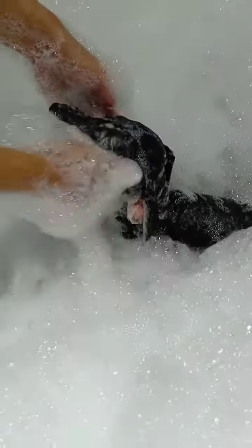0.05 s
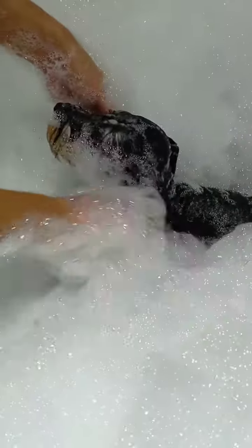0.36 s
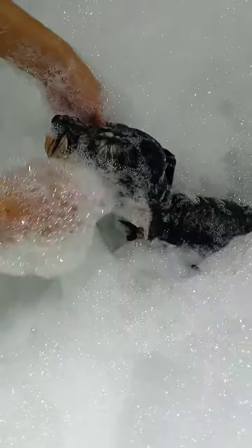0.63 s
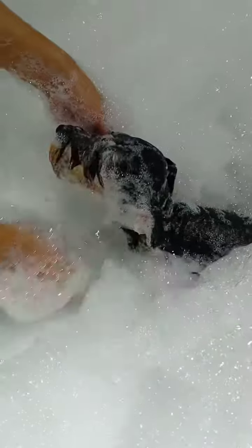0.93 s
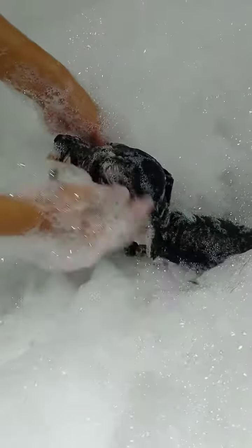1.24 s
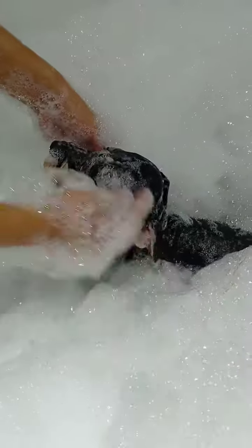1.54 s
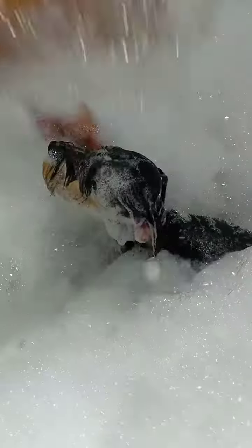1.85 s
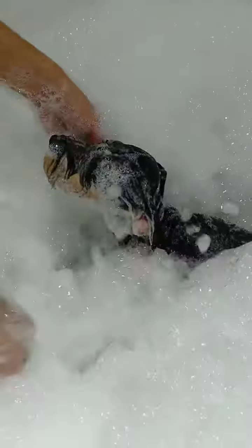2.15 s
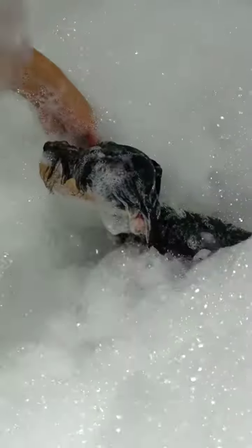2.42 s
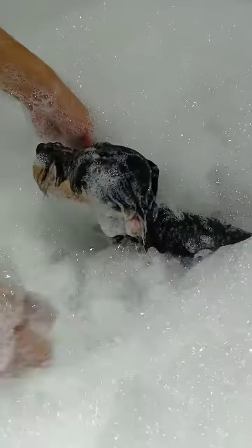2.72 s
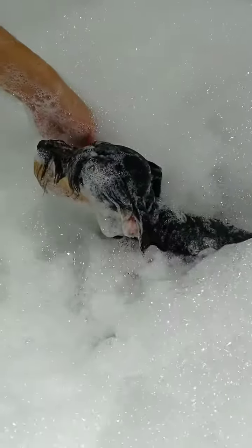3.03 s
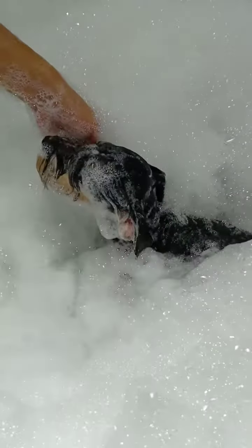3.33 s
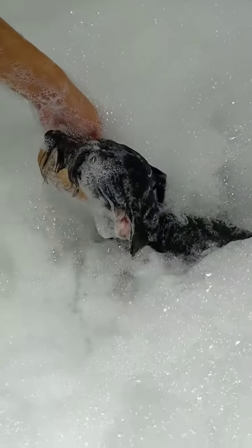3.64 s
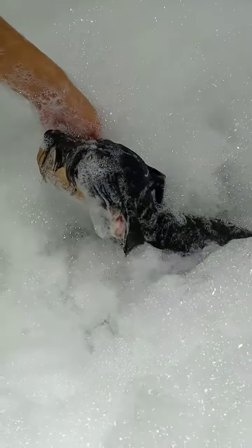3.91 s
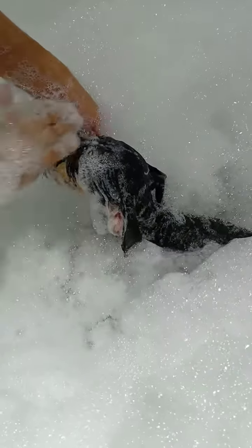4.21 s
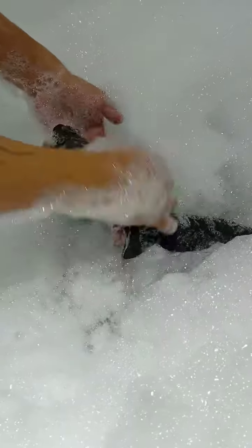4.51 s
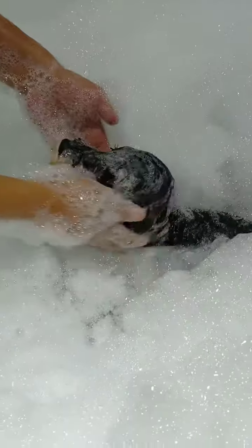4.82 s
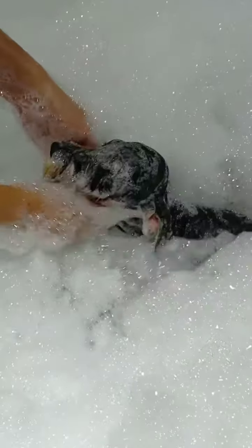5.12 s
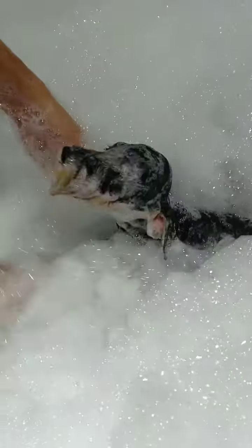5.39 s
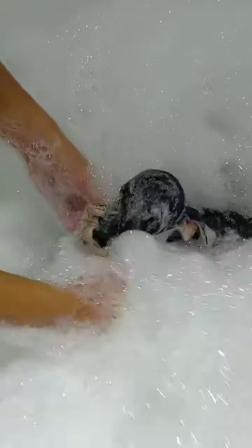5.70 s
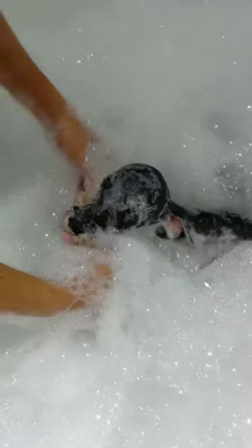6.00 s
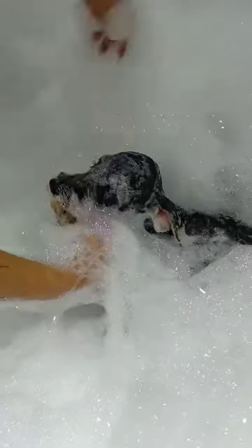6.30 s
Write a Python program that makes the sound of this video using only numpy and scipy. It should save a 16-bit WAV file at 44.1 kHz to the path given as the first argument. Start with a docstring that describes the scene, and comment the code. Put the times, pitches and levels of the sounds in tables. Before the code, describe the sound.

From the start, an air-jet tub's blower runs with a steady, many-toned whine and airy hiss, heard close by in a tiled room. Beneath it the water throbs and churns with low, irregular bubble thumps, and foam crackles faintly. At about 0.4 seconds a handful of water slaps down in a splash, followed by a deep glug and a smaller smack near 0.9. Small drips plink around 1.4 and 2 seconds, with light patter and more glugs near 2.2. At about 3.8 seconds the blower clicks off softly and coasts down, its tones sliding steadily lower and fading through the end. The throbbing thins out after 5 seconds. Soft foam patters continue, a few drips fall between 5.1 and 5.4, and a quiet glug comes near 5.8. A ventilation fan's low, steady hum runs throughout and remains as the sound ends around 6.4 seconds.

```python
"""A fast blower whines over throbbing, churning water: a dog's bath in a foamy air-jet tub in a tiled room.
The rotor sings and hisses as it drives air through the water, where big pockets ring low and small
bubbles burst. A handful of water splashes down once, and foam patters and drips. The blower clicks
off and coasts down, its tones sinking, and leaves the steady hum of a ventilation fan."""
import sys
import numpy as np
from scipy import signal
from scipy.fft import rfft, irfft
from scipy.io import wavfile
from scipy.ndimage import uniform_filter1d, map_coordinates

SR = 44100
rng = np.random.default_rng(int(sys.argv[2]) if len(sys.argv) > 2 else 0)


def to_wav(s):
    """Save 16-bit WAV."""
    ch = np.atleast_2d(s).T  # columns
    pcm = np.round(np.clip(ch, -1, 1) * 32767)  # PCM
    wavfile.write(sys.argv[1], SR, pcm.astype(np.int16))


N = 280035
TIME, FREQS = np.arange(N) / SR, np.maximum(np.fft.rfftfreq(N, 1 / SR), 1)
LEFT_RIGHT = np.array([[1], [-1]])
SWITCH_OFF_S, FULL_TURNS_PER_S = 3.786, 306.5
COASTING = np.clip((TIME - SWITCH_OFF_S) / 0.35, 0, 1)  # 0 under power, 1 while coasting


def from_db(db):
    """Decibels to gain."""
    return 10 ** (np.asarray(db) / 20)


def rms_one(x):
    """Scale to unit power."""
    return x / np.sqrt(np.mean(x ** 2) + 1e-20)


def at_hz(points, hz):
    """Read a curve on a log-frequency axis."""
    f, value = np.transpose(points)
    return np.interp(np.log(hz), np.log(np.sort(f)), value)


def drift(per_s):
    """Smooth random modulation with a spread of about 1."""
    knots, coarse_time = rng.standard_normal(2048), TIME[::64]
    curve = map_coordinates(knots, [coarse_time * per_s + 2], order=3, mode="wrap")
    return np.interp(TIME, coarse_time, curve)


def wobble(per_s):
    """Complex random modulation: loudness and phase waver together."""
    return (drift(per_s) + 1j * drift(per_s)) / np.sqrt(2)


def resonances(modes, hz=FREQS):
    """Gain of a few resonant peaks and dips at the given frequencies."""
    extra_power = sum((from_db(db) ** 2 - 1) / (1 + (2 * (hz - centre) / width) ** 2) ** 2
                      for centre, width, db in modes)
    return np.sqrt(1 + extra_power.clip(-.5))


def grains(per_s, spread_db):
    """Two streams of random clicks, their sizes scattered by spread_db."""
    born = rng.random((2, N)) < per_s / SR
    polarity = rng.choice([-1, 1], (2, N))
    return born * polarity * from_db(spread_db * np.minimum(rng.exponential(1, (2, N)), 4))


def swells(events, bed_db):
    """Gain of a bed with one bell-shaped swell per event, added in power."""
    power = sum(from_db(db) ** 2 * np.exp(-(2 * (TIME - s) / length) ** 2) for s, db, length in events)
    return np.sqrt(from_db(bed_db) ** 2 + power)


# Stereo width. Each row: frequency in Hz, left-right correlation.
LIKENESS = [(60, .95), (150, .98), (290, .86), (450, .62), (700, .5), (1250, -.05), (2000, .1), (3200, .15),
            (5500, -.05), (15000, 0)]
# Stereo balance. Each row: frequency in Hz, left over right in dB.
BALANCE = [(60, -3.5), (110, -2.5), (200, -2), (380, 0.5), (700, -2.5), (1290, 1), (2380, 3), (4400, 0.5),
           (8000, -0.5), (15000, 2)]
def colour(pair, spectrum, peaks=1):
    """Shape two unrelated signals into a unit-power stereo bed, centred in the bass and wide above."""
    mid, side = rfft(pair) * from_db(at_hz(spectrum, FREQS)) * peaks
    alike = np.clip(at_hz(LIKENESS, FREQS), -.99, .99)
    ears = np.sqrt(1 + alike) * mid + LEFT_RIGHT * np.sqrt(1 - alike) * side
    return rms_one(irfft(ears * pan(FREQS), N))


def pan(hz):
    """Left and right gains at a frequency."""
    return from_db(LEFT_RIGHT * at_hz(BALANCE, hz) / 2)


def room(x, t60, wet_db):
    """Direct sound plus a dense tiled-room tail, different at each ear; power is kept."""
    size = SR // 2
    tail = rng.standard_normal((2, size)) * from_db(-60 * TIME[:size] / t60)
    tail *= from_db(wet_db) / np.sqrt(np.sum(tail ** 2, axis=1, keepdims=True))
    wet = signal.fftconvolve(np.atleast_2d(x), tail, axes=1)[:, :N]
    return (x + wet) / np.sqrt(1 + from_db(wet_db) ** 2)


def shaft_speed(friction=13.16, air_drag=.0013425):
    """Turns per second: steady under power, then losing friction + air_drag * speed ** 2 each second."""
    crossover = np.sqrt(friction / air_drag)  # the speed at which both brake equally
    coasting_s = np.maximum(TIME - SWITCH_OFF_S, 0)
    angle = np.arctan(FULL_TURNS_PER_S / crossover) - coasting_s * friction / crossover
    return crossover * np.tan(angle)


def slowdown_db(speed, fall_db):
    """Level change as the rotor slows: down by fall_db for a tenfold drop in speed."""
    return fall_db * np.log10(speed / FULL_TURNS_PER_S)


def rotor_tone(shaft_hz, multiple, level_db, flutter, fading):
    """One harmonic of the shaft: it flutters quickly and wavers slowly."""
    envelope = from_db(level_db) * (1 + flutter * wobble(45) + fading * wobble(9))
    cycles = multiple * np.cumsum(shaft_hz) / SR + rng.random()
    ear_phase = LEFT_RIGHT * np.arccos(at_hz(LIKENESS, multiple * shaft_hz[0])) / 2
    tone = np.sqrt(2) * np.real(envelope * np.exp(1j * (2 * np.pi * cycles + ear_phase)))
    return tone / np.sqrt(1 + flutter ** 2 + fading ** 2)


# The rotor's lead tones. Each row: multiple of the shaft rate, level before the outlet in dB.
LEAD_TONES = [(9, -49.5), (13, -48), (15, -55.5)]
# The 13th harmonic swells and eases. Each row: time in seconds, gain in dB.
HIGH_LEAD_SWELL = [(.55, -11), (.85, -3.5), (1.9, -2.5), (3.78, -6), (4.0, -2.5), (4.5, -2), (4.85, 4),
                   (5.3, -1), (5.7, -2.5), (6.3, -5.5)]
# The outlet's colour on the leads. Each row: frequency in Hz, gain in dB.
OUTLET_EQ = [(1200, -7), (1450, -4), (1650, 1.5), (1850, 4.5), (2080, 1.5), (2290, 5), (2480, -3.5),
             (2760, -0.9), (3050, -13), (3430, -31), (3750, -10.5), (3985, -2.5), (4400, -15)]
# Outlet resonances where a sliding lead flares. Each row: centre in Hz, width in Hz, gain in dB.
OUTLET_MODES = [(1520, 40, 1), (1980, 69, 4.5), (2230, 40, 2), (2640, 60, 4)]
# The other harmonics. Each row: multiple of the shaft rate, level in dB, change when coasting in dB.
BACKING_TONES = [(1, -35, 3), (2, -42.5, 1.5), (3, -44, -1), (5, -57, -2.5), (6, -54, -9), (7, -62, -1),
                 (8, -59, -8), (10, -69.5, 0), (11, -69, -1.5), (12, -67.5, -5), (16, -61.5, -6),
                 (17, -67, -4.5), (18, -59, 2.5), (19, -72, -3.5), (20, -79.5, 9.5), (21, -84.5, 10.5),
                 (22, -83.5, 11), (25, -96.5, 20), (28, -93.5, 16)]
# The housing's colour on those as they slide. Each row: frequency in Hz, relative gain in dB.
HOUSING_EQ = [(130, -4), (300, 0), (700, 2), (1100, 4), (1450, -3), (2100, 2), (2400, -3), (2800, -8),
              (3200, -16), (4400, -18), (5400, -13), (7000, -26)]
def whine(speed, jitter=0.00061, flutter=0.12, coast_flutter=.65, low_flutter=0.29):
    """Rotor tones slide through outlet and housing; coasting, they fade and smear in their own reverb."""
    shaft_hz = speed * (1 + jitter * drift(25))
    swell_db = np.interp(TIME, *np.transpose(HIGH_LEAD_SWELL))
    voices = []
    for multiple, db in LEAD_TONES:
        hz = multiple * speed
        lead_db = db + (swell_db if multiple == 13 else 0)
        outlet_db = at_hz(OUTLET_EQ, hz) + 20 * np.log10(resonances(OUTLET_MODES, hz))
        voices.append((multiple, lead_db + outlet_db + slowdown_db(speed, fall_db=14)))
    for multiple, db, coast_db in BACKING_TONES:
        hz = multiple * speed
        housing_db = at_hz(HOUSING_EQ, hz) - at_hz(HOUSING_EQ, hz[0])
        voices.append((multiple, db + COASTING * coast_db + housing_db + slowdown_db(speed, fall_db=42)))
    rough = flutter + COASTING * (coast_flutter - flutter)
    tones = sum(rotor_tone(shaft_hz, multiple, db, rough + low_flutter / multiple, fading=0.063)
                for multiple, db in voices)
    return (1 - COASTING) * tones + room(COASTING * tones, t60=.35, wet_db=-1.5)


# Cavities of the impeller casing. Each row: centre in Hz, width in Hz, gain in dB.
CASING_MODES = [(1158, 70, 10), (1090, 72, 13), (1010, 50, 6.5), (695, 120, 10)]
def whir(speed, start_db=-51.5, growth_db_per_s=2.08, coast_db=-0.5):
    """Impeller eddies breathe at four times the shaft rate; as the band sinks, the casing howls."""
    eddies = np.array([wobble(140), wobble(140)])
    grown_db = growth_db_per_s * np.minimum(TIME, SWITCH_OFF_S)
    gain = from_db(start_db + grown_db + coast_db * COASTING + slowdown_db(speed, fall_db=24))
    band = np.sqrt(2) * gain * np.real(eddies * np.exp(2j * np.pi * np.cumsum(4 * speed) / SR))
    howl = irfft(rfft(band) * resonances(CASING_MODES), N)
    return room(howl, t60=.45, wet_db=-3)


# The blower's hiss. Each row: frequency in Hz, relative level in dB.
RUSH_EQ = [(600, -25), (950, -4.5), (1150, -4), (1400, -7), (2100, -5), (2700, -10), (3150, -23.5),
           (4300, -22.5), (5250, -16.5), (5750, -26.5), (6500, -28.5), (7400, -42), (8600, -37),
           (9700, -47.5), (12000, -43.5), (13700, -42), (15500, -50.5)]
# The duct's ring. Each row: centre in Hz, width in Hz, gain in dB.
DUCT_MODES = [(1030, 89, 2.5), (1085, 20, 13.5), (1120, 85, 8.5), (1238, 25, 7.5), (1277, 21, 12),
              (1530, 20, 8), (1953, 3.8, 9.5), (2220, 61, -8.5)]
def air_rush(speed, ringing_db=-34, plain_db=-33):
    """Turbulence hisses out of the blower and rings its duct, most strongly at full speed."""
    noise = rng.standard_normal((2, N))
    ringing = from_db(ringing_db) * colour(noise, RUSH_EQ, resonances(DUCT_MODES))
    plain = from_db(plain_db) * colour(noise, RUSH_EQ)
    blend = from_db(slowdown_db(speed, fall_db=28))
    return from_db(slowdown_db(speed, fall_db=38)) * (blend * ringing + (1 - blend) * plain)


# The low bed of air pockets. Each row: frequency in Hz, relative level in dB.
RUMBLE_EQ = [(25, -44), (40, -40), (50, -24), (75, -17.5), (95, -12), (109, -17.5), (121, -2.5), (145, 3),
             (168, -13), (205, -4.5), (228, -18), (300, -20), (450, -44.5), (2000, -79.5)]
# The boom of tub and room. Each row: centre in Hz, width in Hz, gain in dB.
BOOM_MODES = [(69, 6.8, -1.5), (98, 9.3, 4), (123.3, 11, 6.5), (133, 22, -1), (204, 29, 4), (240, 17, -3.5)]
# The rumble heaves. Each row: peak time in seconds, level in dB, length in seconds.
HEAVES = [(.48, -29.5, 0.085), (1.78, -28, 0.17), (2.25, -28, 0.3), (3.15, -36, 0.099), (3.66, -26.5, 0.11),
          (4.17, -34, 0.17), (5.41, -31, 0.15), (5.93, -37, 0.092), (6.28, -36.5, 0.059)]
def rumble(speed, bed_db=-30, surge_db=2):
    """Lesser air pockets thump in the tub: a crowd that heaves and thins out with the air flow."""
    thumps = grains(1200 * speed / FULL_TURNS_PER_S, spread_db=0)
    crowd = colour(thumps, RUMBLE_EQ, resonances(BOOM_MODES))
    crowd /= np.sqrt(uniform_filter1d(np.mean(crowd ** 2, axis=0), SR // 25) + 1e-9)  # level over 40 ms
    return crowd * swells(HEAVES, bed_db + slowdown_db(speed, fall_db=37) + surge_db * drift(24))


# The throb. Each row: peak time in seconds, relative level in dB, pitch in Hz, swell in seconds.
AIR_POCKETS = [(0.023, -21.5, 182, 0.035), (0.087, -12, 137, 0.012), (0.188, -17, 143, 0.018),
               (0.298, -17.5, 133, 0.012), (0.347, -16, 172, 0.011), (0.387, -16, 167, 0.0063),
               (0.438, -15, 144, 0.01), (.487, -19, 136, 0.0063), (0.521, -13.5, 170, 0.0096),
               (0.703, -21, 140, 0.024), (0.751, -17, 167, 0.019), (0.904, -23, 157, 0.008),
               (1.035, -16.5, 141, 0.026), (1.099, -15.5, 190, 0.013), (1.162, -15.5, 143, 0.02),
               (1.338, -15, 156, 0.01), (1.368, -22, 136, 0.022), (1.534, -20, 124.7, .035),
               (1.581, -15, 146, 0.0088), (1.646, -26, 141, .013), (1.74, -17, 146, 0.036),
               (1.781, -29, 129, 0.0098), (1.821, -30, 145, .01), (1.907, -27, 155, 0.012),
               (1.946, -17.5, 153, 0.02), (1.992, -15, 129, 0.014), (2.043, -15, 163, 0.012),
               (2.145, -23, 190, 0.032), (2.223, -17.5, 140, 0.027), (2.289, -12, 128.5, 0.028),
               (2.35, -26, 130, 0.016), (2.397, -26.5, 135, 0.012), (2.508, -21, 133, 0.02),
               (2.641, -12.5, 146.3, 0.022), (2.755, -15, 178, 0.032), (2.836, -21, 150, 0.011),
               (2.89, -13.5, 168, 0.011), (2.928, -23, 154, 0.011), (2.955, -15.5, 154, 0.013),
               (2.978, -27, 151, 0.0065), (3.012, -19, 146, 0.0087), (3.055, -23, 169, 0.0093),
               (3.14, -23, 163, 0.013), (3.268, -21, 145, 0.028), (3.338, -21, 139, 0.02),
               (3.467, -16, 147, 0.013), (3.563, -14, 151, 0.0078), (3.641, -15, 137, 0.022),
               (3.684, -26, 167, 0.018), (3.736, -21, 174, 0.015), (3.787, -16, 178, 0.012),
               (3.846, -18.5, 132, 0.02), (3.954, -16.5, 168, 0.013), (4.12, -20, 161, 0.026),
               (4.214, -22, 176, 0.0065), (4.282, -18, 174, 0.0089), (4.379, -18.5, 163, 0.029),
               (4.484, -23, 141, 0.014), (4.546, -14, 190, 0.007), (4.597, -19.5, 188, 0.0083),
               (4.667, -32, 166, 0.013), (4.725, -25, 138, 0.014), (4.787, -20.5, 143, 0.026),
               (4.844, -38, 159, 0.011), (4.922, -16.5, 193, 0.025), (5.001, -18.5, 157, 0.016),
               (5.113, -22, 176, 0.02)]
def air_pockets(gain_db=-3, chirp=0.14, low_cut_hz=95):
    """Each big pocket swells within a few cycles and rings out, rising a little as it floats up."""
    out = np.zeros(N)
    for s, db, hz, swell in AIR_POCKETS:
        span = (TIME > s - swell) & (TIME < s + 8 * swell)
        age = TIME[span] - s
        envelope = ((1 + age / swell) * np.exp(-age / swell)) ** 2
        cycles = hz * age * (1 + chirp * age) + rng.random()
        out[span] += from_db(db + gain_db) * envelope * np.sin(2 * np.pi * cycles)
    return signal.sosfilt(signal.butter(2, low_cut_hz, "high", fs=SR, output="sos"), out) * pan(hz=150)


# The body of the churning water. Each row: frequency in Hz, relative level in dB.
CHURN_EQ = [(30, -54), (120, -22), (240, -1), (275, 4), (305, 7.5), (335, 5), (370, 0), (480, 4.5),
            (580, -1.5), (700, -3.5), (850, -4.5), (1000, -18), (1500, -33.5), (4000, -76)]
# The tub's hollow ring. Each row: centre in Hz, width in Hz, gain in dB.
TUB_MODES = [(231, 32, 8.5), (484, 18, -1.5), (590, 11, 5.5), (677.7, 30, 11), (779, 68, 4)]
# The water sloshes. Each row: peak time in seconds, relative level in dB, length in seconds.
SLOSHES = [(0.52, -40.5, 0.072), (1.06, -32, 0.066), (1.78, -36, 0.15), (2.24, -38.5, 0.12),
           (2.95, -35.5, 0.074), (5.3, -37, 0.53)]
def churn(speed, bed_db=-35, lump_db=1, gain_db=4, stall_turns_per_s=208, stall_db=-7):
    """Small bubbles burst in crowds, harder with each slosh, and die down once the air stalls."""
    stalled = np.clip((stall_turns_per_s - speed) / 69, 0, 1)  # 1: air barely pushes through the water
    bursts = grains(4000 * speed / FULL_TURNS_PER_S, spread_db=1.5)
    bubbles = colour(bursts, CHURN_EQ, resonances(TUB_MODES))
    envelope = swells(SLOSHES, bed_db + slowdown_db(speed, fall_db=2) + stall_db * stalled)
    return bubbles * from_db(gain_db + lump_db * drift(22.13)) * envelope


# The fan's hum. Each row: pitch in Hz, level in dB.
FAN_TONES = [(187.8, -30), (375.7, -46.5)]
# The fan's breath. Each row: frequency in Hz, relative level in dB.
FAN_AIR_EQ = [(40, -22), (70, -16), (100, -15), (145, -8), (230, -4.5), (450, -4.5), (700, -11.5),
              (1000, -11), (1350, -29.5), (2200, -17), (3100, -24), (5200, -36.5), (7500, -67.5),
              (15000, -61)]
def fan(waver_db=1.13, wander=0.0015, pan_db=-0.26, air_db=-41):
    """A ventilation fan hums under everything, wavering slightly over soft air noise."""
    warped_time = TIME + np.cumsum(wander * drift(5.5)) / SR
    hum = np.zeros(N)
    for hz, db in FAN_TONES:
        gain = np.sqrt(2) * from_db(db + waver_db * drift(11))
        hum += gain * np.sin(2 * np.pi * (hz * warped_time + rng.random()))
    breath = from_db(air_db) * colour(rng.standard_normal((2, N)), FAN_AIR_EQ)
    return hum * from_db(pan_db * LEFT_RIGHT) + breath


# Splashes and foam patter, plus the blower's switch clicking off at 3.77 s.
# Each row: start in seconds, level in dB, rise and decay in seconds.
SPLASHES_AND_CLICK = [(0.431, -29, .004, 0.03), (0.448, -36, 0.004, 0.034), (0.47, -38, 0.026, 0.045),
                      (.55, -45, .02, .07), (0.845, -44, 0.006, .028), (2.115, -44, .008, 0.04),
                      (3.77, -42, 0.015, 0.07), (4.15, -58, .02, 0.068), (4.29, -48, 0.019, 0.033),
                      (4.6, -49, 0.0089, 0.056), (5.47, -49, 0.0074, .02), (5.53, -48.5, .04, 0.04),
                      (6.22, -54, 0.018, 0.045)]
# Their sparkle. Each row: frequency in Hz, relative level in dB.
BURST_EQ = [(100, -26.5), (400, -16), (1000, -3.5), (2300, 12), (3400, -3.5), (5600, 3.5), (6500, -7.5),
            (8000, -20), (11000, -26), (14000, -20.5), (16000, -25.5)]
def splashes_and_click(foam_db=-64, crackle_db=-5):
    """Splash, patter and switch click are dying bursts of grains; foam crackles faintly throughout."""
    envelope = from_db(foam_db)
    for s, db, rise, decay in SPLASHES_AND_CLICK:
        age = np.maximum(TIME - s, 0)
        attack = np.minimum(age / rise, 1)
        envelope = envelope + from_db(db) * attack * np.exp(-np.maximum(age - rise, 0) / decay)
    fizz = colour(grains(3000, spread_db=3), BURST_EQ)
    crackle = from_db(crackle_db) * colour(grains(300, spread_db=2), BURST_EQ)
    return room(envelope * rms_one(fizz + crackle), t60=.25, wet_db=-8)


# Smacks on the surface. Each row: start in seconds, level in dB, decay in seconds.
SLAPS = [(.4332, -40, .002), (0.437, -36, .0028), (.442, -41, .003), (.852, -46, .006)]
# Their bright edge. Each row: frequency in Hz, relative level in dB.
SLAP_EQ = [(500, -6), (2500, 2), (5500, 2), (8000, -1), (11000, -14), (15000, 0)]
def slaps():
    """Lumps of water hit flat: each gives a bright crack of a few milliseconds."""
    envelope = sum(from_db(db) * (TIME >= s) * np.exp(-np.maximum(TIME - s, 0) / decay)
                   for s, db, decay in SLAPS)
    return room(envelope * colour(rng.standard_normal((2, N)), SLAP_EQ), t60=.25, wet_db=-8)


# Deep glugs. Each row: start in seconds, level in dB, pitch in Hz, seconds to fade by 60 dB.
GULPS = [(0.507, -10.5, 300, 0.1), (2.199, -10.5, 188.6, 0.2), (2.25, -7, 339, 0.035),
         (3.674, -23, 218, 0.14), (5.788, -22.5, 204, 0.25)]
def gulps(swell_s=0.0053, chirp=0.86):
    """A large air pocket wobbles as it breaks the surface: a low, briefly rising note."""
    out = np.zeros(N)
    for s, db, hz, t60 in GULPS:
        age = np.clip(TIME - s, 0, 4 * t60)
        envelope = from_db(db - 60 * age / t60) * (1 - np.exp(-age / swell_s))
        out += envelope * np.sin(2 * np.pi * (hz * age * (1 + chirp * age) + rng.random()))
    return out * pan(hz=200)


# Single plinks. Each row: start in seconds, level in dB, pitch in Hz, seconds to fade by 60 dB.
DRIPS = [(1.363, -29, 2230, 0.049), (2.014, -33, 2490, 0.052), (5.138, -26.5, 670, 0.045),
         (5.258, -34.5, 900, 0.086), (5.334, -30, 642, 0.092)]
def drips(chirp=12):
    """A drop traps a bubble whose ring rises as it nears the surface."""
    out = np.zeros(N)
    for s, db, hz, t60 in DRIPS:
        age = np.clip(TIME - s, 0, 4 * t60)
        out += from_db(db - 60 * age / t60) * np.sin(2 * np.pi * hz * age * (1 + chirp * age))
    return room(out, t60=0.36, wet_db=-3)


def scene():
    """Blower, water and fan together; the shaft speed drives the blower, rumble and churn."""
    speed = shaft_speed()
    blower = whine(speed) + whir(speed) + air_rush(speed)
    water = rumble(speed) + air_pockets() + churn(speed) + gulps() + slaps()
    return blower + water + splashes_and_click() + drips() + fan()


def record(dry, low_cut_hz=38, high_cut_hz=15400, fade_s=.003):
    """The microphone loses the deep bass; the top is cut steeply; both ends fade quickly."""
    dry = signal.sosfilt(signal.butter(2, low_cut_hz, "high", fs=SR, output="sos"), dry)
    fade = np.clip(np.minimum(TIME, TIME[-1] - TIME) / fade_s, 0, 1)
    return signal.sosfilt(signal.ellip(10, .1, 80, high_cut_hz, fs=SR, output="sos"), dry * fade)


dry = scene()
out = record(dry)
to_wav(out)
```